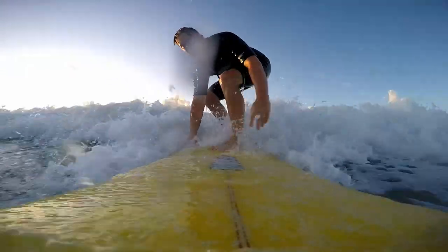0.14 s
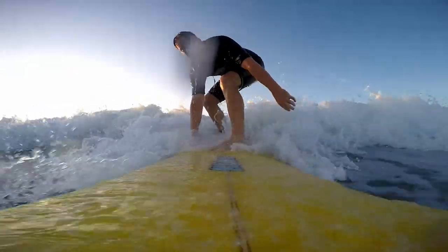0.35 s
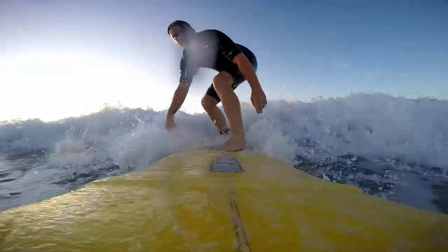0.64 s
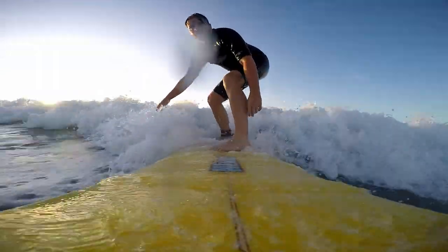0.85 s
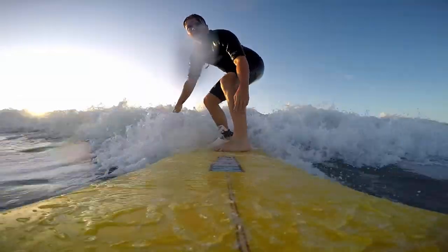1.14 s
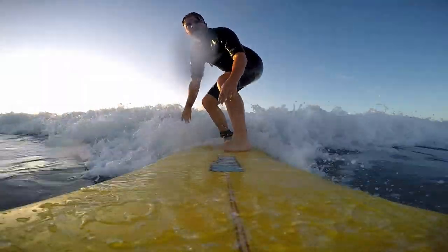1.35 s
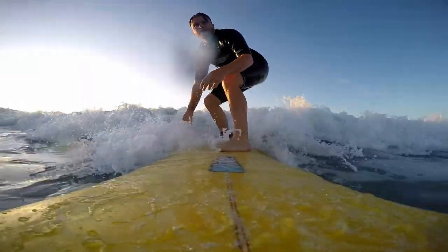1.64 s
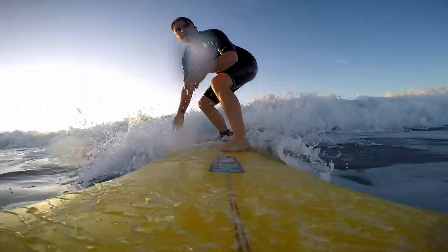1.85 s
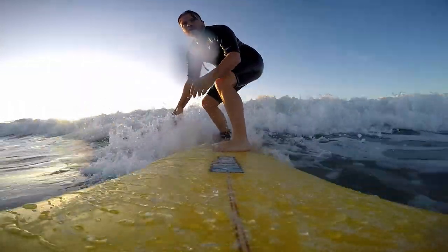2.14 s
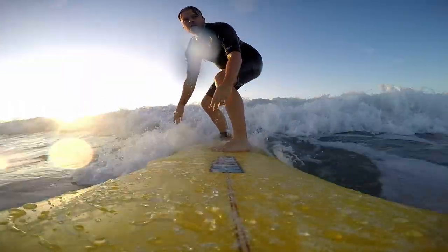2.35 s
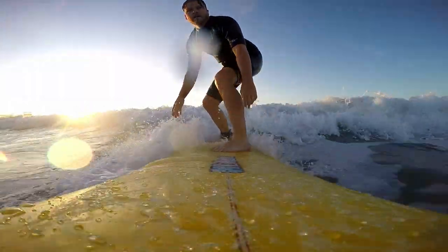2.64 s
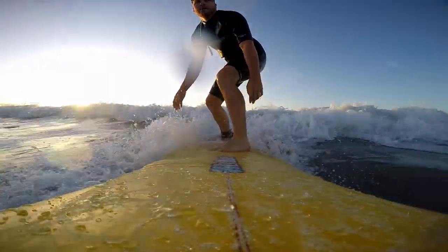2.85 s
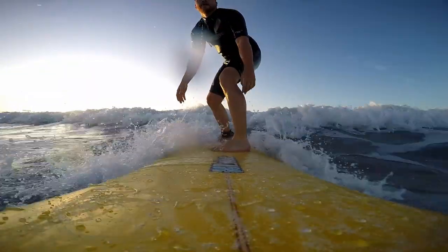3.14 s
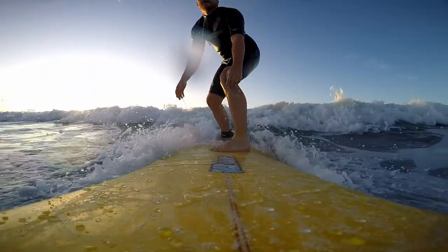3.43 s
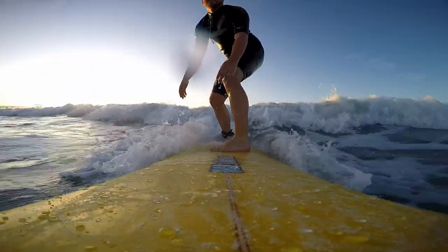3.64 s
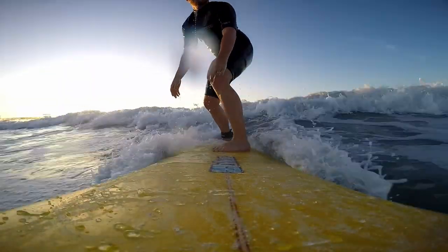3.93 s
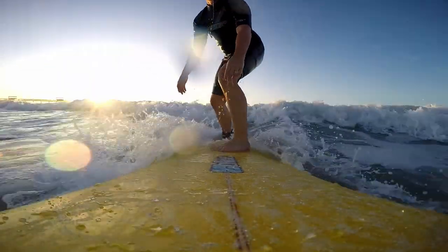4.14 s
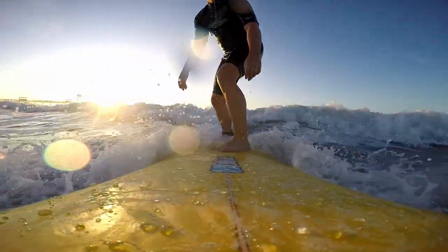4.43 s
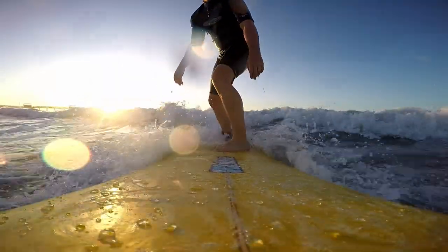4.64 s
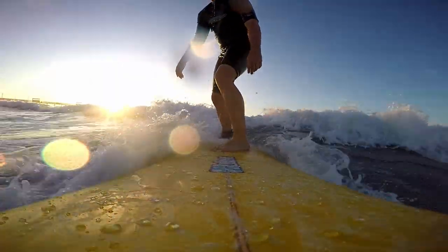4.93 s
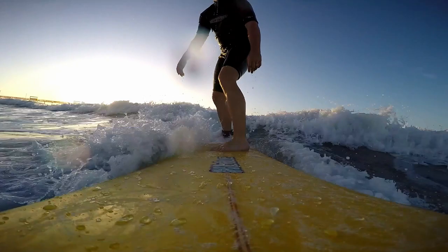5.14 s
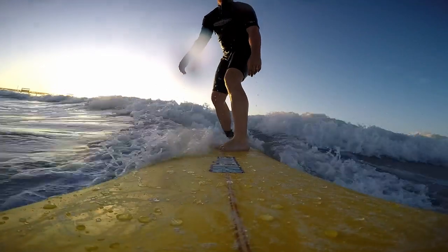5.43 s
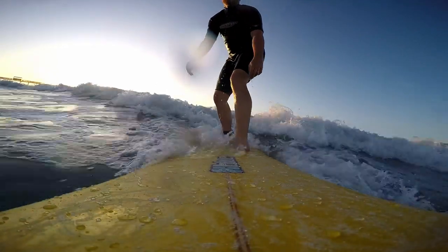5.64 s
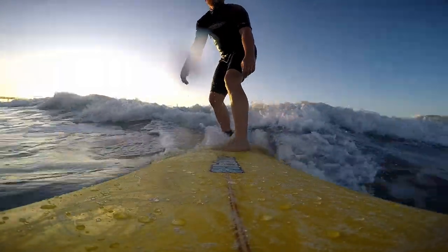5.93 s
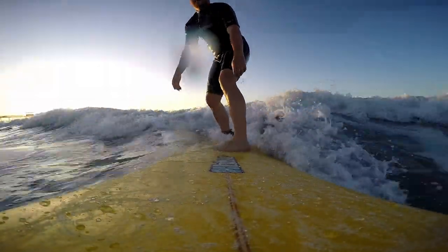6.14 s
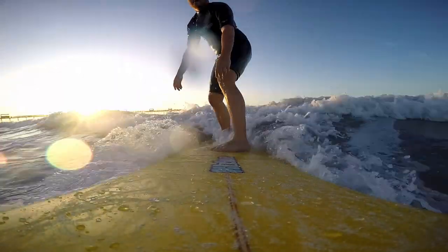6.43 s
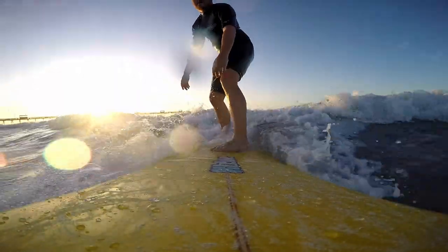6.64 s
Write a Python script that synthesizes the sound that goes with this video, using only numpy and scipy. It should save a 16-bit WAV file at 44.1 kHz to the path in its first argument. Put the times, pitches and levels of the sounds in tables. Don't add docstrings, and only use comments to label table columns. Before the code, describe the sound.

A continuous ride on whitewater, heard through the sealed shell of a camera on a surfboard's nose, so the water is dull and close with little treble. From 0 to 0.5 seconds, strong slaps, drops striking the housing and hollow air bursts crowd together over a deep, shuddering rumble. From 0.6 to 1.4 the foam thins, with a bump and small drops near 1.0 and weak plastic ticks. Thuds resume around 1.45, and fuller gurgling swells at 2.3 to 3.2 with irregular low bumps. Slaps and rattling clusters continue, busier from 4.1 to 4.8, with a strong splash near 4.4. The steady wash dips around 5 to 5.6 while bubbly surges and knocks persist. From 6.0 to 6.4 loud rising bloops and thick gurgling dominate; froth brightens briefly at 6.5. At 6.78 a sharp splash, bubble burst and heavy bump end it abruptly.

```python
import sys
import numpy as np
from scipy import signal
from scipy.fft import rfft, irfft, next_fast_len
from scipy.io import wavfile
from scipy.ndimage import map_coordinates

SR = 44100
rng = np.random.default_rng(int(sys.argv[2]) if len(sys.argv) > 2 else 0)


def linear_from_db(decibels):
    return 10 ** (np.asarray(decibels, float) / 20)


def to_wav(sig):
    pcm = np.clip(np.atleast_2d(sig), -1, 1) * 32767
    pcm = np.round(pcm).astype(np.int16)
    wavfile.write(sys.argv[1], SR, pcm.T)


N = 299770

# time in seconds, level in dB.
SPRAY_LEVEL = [(0.0, -60.5), (0.3, -61.5), (0.53, -68.5), (0.89, -73), (1.53, -68.5), (2.61, -66.5),
               (3.22, -61), (3.69, -67.5), (4.37, -63.5), (5.24, -64), (5.41, -65), (6.0, -64.5),
               (6.19, -61), (6.8, -62)]
# time in seconds, flow in dB, froth relative to gurgle in dB.
FOAM_FLOW = [(0, -41, -5), (.4, -46.5, -6), (.8, -49, -7.5), (1.3, -53.5, -8), (1.9, -46, -7),
             (2.4, -43, -7), (2.7, -38.5, -5.5), (3.0, -40, -4.5), (3.6, -46, -5.5), (4.1, -37, -4.5),
             (4.6, -40.5, -5), (5.0, -53, -4.5), (5.5, -59, -4.5), (5.9, -46, -6), (6.3, -40.5, -9.5),
             (6.5, -38, -0.5), (6.72, -38, -8.5), (6.8, -55, 5)]
# peak time in seconds, slap level in dB,
# gurgle level in dB, rise in seconds, fall in seconds.
SURGES = [(.01, -26, -36, 0.014, 0.0069), (.14, -36, -41.5, 0.041, 0.29), (.35, -31.5, -38.5, 0.022, 0.019),
          (0.408, -32.5, -33, 0.01, 0.036), (.61, -45.5, -53, 0.099, 0.13), (.84, -47, -63, 0.068, 0.045),
          (1.0, -45.5, -45.5, 0.087, 0.36), (1.48, -34.5, -37, 0.084, 0.02),
          (1.86, -37, -37.5, 0.38, 0.043), (2.29, -39, -37.5, 0.23, 0.18), (2.38, -37, -42.5, 0.14, 0.087),
          (2.8, -35.5, -39.5, 0.084, 0.059), (3.14, -35.5, -35.5, 0.12, 0.52),
          (3.76, -35, -39.5, 0.11, 0.05), (4.122, -34, -47, 0.062, 0.08), (4.4, -31, -31.5, 0.048, 0.11),
          (4.67, -40, -36.5, 0.025, 1), (5.03, -38.5, -34.5, 0.11, 0.29), (5.401, -36.5, -36.5, 0.22, 0.07),
          (5.63, -38.5, -32.5, 0.056, 0.1), (5.8, -39, -34.5, 0.053, 0.021), (6.16, -37, -33, 0.27, 0.07),
          (6.36, -36.5, -28.5, 0.12, 0.047), (6.785, -30, -31, 0.026, 0.14)]
# frequency in Hz, level in dB.
HEAVE_SPECTRUM = [(8, -20.5), (18, -3), (28, -6.5), (45, -1.5), (65, -14.5), (90, -43), (130, -120)]
SLAP_SPECTRUM = [(45, -120), (70, -8.5), (110, -7.5), (180, -3), (260, 1), (310, -2), (390, -7.5),
                 (520, -120)]
GURGLE_SPECTRUM = [(300, -120), (400, -8.5), (490, -3.5), (650, -1), (850, -3), (1000, -7.5), (1080, -16),
                   (1300, -120)]
FROTH_SPECTRUM = [(850, -120), (1080, -7), (1350, -4), (1600, -3), (1800, -6.5), (2000, -17.5),
                  (2500, -120)]
SPRAY_SPECTRUM = [(1400, -120), (1900, -1), (2500, -6.5), (3200, -9), (4000, -12), (5000, -19.5),
                  (6000, -21.5), (7500, -25), (9500, -28.5), (11000, -120)]
# start in seconds, peak level in dB, pitch in Hz.
AIR_POCKETS = [(.206, -20.5, 547), (.331, -18, 670), (.341, -26, 1010), (.072, -33, 640), (.173, -29, 536),
               (.859, -31, 610), (.887, -34, 630), (.919, -28, 595), (.964, -37, 700), (1.303, -33, 514),
               (1.347, -28, 585), (1.397, -28, 680), (2.663, -30, 510), (0.417, -22, 448),
               (2.292, -23.5, 650), (2.421, -22.5, 734), (2.582, -28, 790), (5.0, -22, 1030),
               (3.402, -25, 704), (4.143, -34, 640), (4.197, -28, 710), (4.384, -24, 564), (4.54, -25, 640),
               (4.785, -21.5, 710), (5.321, -19.5, 772), (5.6, -19, 760), (5.794, -30, 594),
               (6.019, -17, 675), (6.098, -23, 673), (6.234, -19, 637), (6.257, -32, 640),
               (6.3, -14.5, 726), (6.651, -19.5, 633), (6.776, -14.5, 790)]
# start in seconds, peak level in dB, pitch in Hz.
THUDS = [(0.128, -26, 332), (0.583, -37, 236), (0.827, -31, 215), (0.947, -39, 208), (1.098, -37, 190),
         (1.426, -25, 246), (1.456, -27.5, 157), (1.589, -42, 145), (1.673, -25.5, 255), (1.767, -33, 218),
         (1.838, -33, 196), (2.281, -21.5, 207), (2.329, -31, 186), (2.379, -24, 268), (2.767, -22.5, 290),
         (3.119, -27.5, 257), (3.169, -24, 277), (3.74, -26, 275.5), (3.966, -30.5, 232),
         (4.105, -21.5, 272.3), (4.198, -25.5, 250), (4.378, -24, 238), (4.658, -24, 250), (4.71, -24, 229),
         (4.959, -28, 274), (5.309, -24, 143), (5.392, -31, 308), (5.791, -31, 155), (6.023, -24.5, 286),
         (6.1, -24, 260), (6.154, -27, 254), (6.308, -26, 237), (6.369, -30, 284), (6.487, -32, 240)]
# start in seconds, peak level
# in dB, pitch in Hz, crack level in dB.
DROPS = [(.032, -47, 3600, -5.5), (.066, -56, 7860, -7), (.074, -54, 5400, -16), (0.092, -29.5, 1530, -41),
         (.108, -54, 5800, -26), (0.1467, -37, 3130, -24), (0.153, -34.5, 1500, -15),
         (.173, -26.5, 1460, -33), (0.369, -30.5, 65.6, -58), (0.3996, -26.5, 2450, -20),
         (0.401, -38, 3870, -29), (.401, -23, 1180, -40), (.4016, -24.5, 386, -25),
         (0.4087, -35.5, 2620, -14.5), (0.418, -25.5, 960, -12), (0.4433, -40.5, 3050, -23),
         (0.984, -30.5, 70.4, -60), (0.992, -37, 1040, -25), (.998, -46, 2100, -21),
         (1.0047, -31, 1110, -19), (1.0062, -30, 400, -18), (1.0245, -49.5, 4000, -2.5),
         (1.045, -38, 2180, -18), (1.062, -46.5, 2660, -16), (4.947, -45, 3040, -22),
         (5.63, -46, 2760, -31), (6.403, -28, 1500, -24), (6.7729, -23, 1400, -46),
         (6.7766, -18, 1440, -46), (6.782, -16.5, 790, -40), (6.7849, -27.5, 90.4, -43)]
# time in seconds, level in dB.
BREAK_TICKS = [(0.0032, -47.5), (0.2123, -49), (0.2203, -55), (0.2312, -52), (0.2432, -54), (0.3115, -62),
               (0.315, -51), (0.3186, -61), (0.3231, -53), (0.3354, -47), (0.3425, -48), (0.3575, -50),
               (0.3627, -55), (0.4112, -53), (0.4765, -57), (0.5397, -57.5), (0.5901, -51.5), (0.5986, -61),
               (0.6058, -62), (0.6112, -59), (0.7253, -65), (0.7332, -64), (0.7399, -64), (0.7433, -57.5),
               (0.7865, -61), (0.8246, -57), (0.8316, -56), (0.8381, -54), (0.8547, -63), (0.8582, -62),
               (0.918, -64), (0.9217, -67), (0.9631, -58), (0.9669, -56), (1.0513, -60), (1.0652, -54),
               (1.1307, -66), (1.1784, -61), (1.1887, -64), (1.1926, -60), (1.2076, -61), (1.2233, -60),
               (1.2377, -64), (1.2441, -62), (1.266, -61), (1.2696, -58), (1.2851, -59), (1.2987, -62),
               (1.3202, -60), (1.3255, -62), (1.3334, -64.5), (1.3424, -61), (1.4604, -50), (1.469, -53),
               (1.4754, -57), (1.4814, -50.5), (1.4856, -61), (1.5685, -61), (1.5885, -54), (1.5926, -56)]
CHOP_TICKS = [(1.6038, -54), (1.6093, -57), (1.615, -59), (1.6297, -56), (1.634, -63), (1.642, -62),
              (1.6809, -53.5), (1.6882, -61), (1.6929, -56), (1.7026, -59), (1.7071, -57), (1.7129, -56),
              (1.7204, -53), (1.7251, -58), (1.7336, -52), (1.7402, -54), (1.7516, -55), (1.7766, -58),
              (1.7893, -54), (1.842, -52), (1.8458, -46.5), (1.8495, -53), (1.8546, -52.5), (1.8645, -57),
              (1.8779, -56), (1.8892, -51), (1.9823, -53), (1.9867, -66), (1.9936, -64), (2.0511, -62),
              (2.1901, -61), (2.2594, -58.5), (2.2874, -50), (2.2918, -47.5), (2.2961, -51), (2.3239, -61),
              (2.3295, -51), (2.34, -53.5), (2.3548, -53), (2.3585, -60), (2.3711, -58), (2.3747, -50),
              (2.4686, -57), (2.4823, -52), (2.4861, -55.5), (2.4979, -56), (2.5688, -56), (2.5728, -59),
              (2.5775, -65), (2.5996, -63), (2.6086, -62), (2.6245, -56), (2.6378, -65), (2.6613, -56),
              (2.6773, -57), (2.6891, -61), (2.6926, -59), (2.6966, -62), (2.7023, -54), (2.7192, -60.5)]
FACE_TICKS = [(2.8015, -57), (2.8111, -54), (2.8738, -51), (2.8854, -59), (2.8904, -59), (2.894, -53),
              (2.9005, -65), (2.914, -53), (2.918, -49.5), (2.9216, -57), (2.9288, -58), (2.94, -59),
              (2.951, -61), (2.9517, -53), (2.9685, -57), (2.9994, -61), (3.0158, -60.5), (3.0366, -57),
              (3.1665, -48), (3.1723, -58), (3.1841, -51), (3.2655, -61), (3.289, -55), (3.298, -50),
              (3.3126, -57), (3.4042, -50), (3.4326, -58), (3.4404, -49.5), (3.4728, -54), (3.5505, -62),
              (3.5557, -67), (3.5607, -58), (3.579, -66), (3.5853, -55), (3.7114, -65), (3.7318, -52),
              (3.746, -48.5), (3.7567, -52), (3.7622, -56), (3.7658, -55), (3.77, -54.5), (3.8675, -58),
              (3.8732, -55), (3.879, -56), (3.992, -58.5), (4.0966, -56), (4.1079, -51), (4.1404, -54),
              (4.144, -59), (4.15, -48), (4.158, -57), (4.1633, -55), (4.1808, -53), (4.2042, -53),
              (4.2063, -55), (4.2172, -50), (4.2437, -60), (4.25, -62), (4.253, -56), (4.2943, -59)]
TROUGH_TICKS = [(4.326, -59), (4.37, -51), (4.4014, -45.5), (4.406, -56), (4.412, -50), (4.4324, -41),
                (4.4464, -43), (4.455, -52), (4.496, -59), (4.5014, -58), (4.5254, -61), (4.557, -57),
                (4.5614, -58), (4.6103, -60), (4.611, -59), (4.6222, -54), (4.6613, -52), (4.666, -49),
                (4.676, -50), (4.6812, -47.5), (4.687, -52), (4.7054, -54), (4.733, -46), (4.7376, -49),
                (4.7448, -50), (4.748, -58), (4.7958, -48), (4.8004, -56), (4.8076, -51.5), (4.8158, -61),
                (4.8186, -54), (4.8271, -57), (4.853, -55), (4.8589, -60), (4.8623, -54), (4.8696, -59.5),
                (4.8763, -59.5), (4.9344, -57), (4.9409, -53), (4.9933, -54), (5.0376, -49), (5.0452, -52),
                (5.0514, -55), (5.0828, -52), (5.0986, -60), (5.179, -60), (5.2838, -56.5), (5.3208, -52.5),
                (5.3347, -56), (5.3446, -57), (5.3962, -52), (5.4072, -46), (5.414, -54), (6.033, -55),
                (6.0402, -53), (6.0455, -58), (6.113, -52.5), (6.1547, -50), (6.1622, -42.5), (6.1677, -50)]
FOAM_TICKS = [(0.0084, -52), (0.0131, -49), (4.2364, -59), (4.274, -57), (6.2033, -54), (6.2916, -51.5),
              (6.327, -52.5), (6.3666, -55), (6.4934, -57), (6.5014, -48.5), (6.5068, -59), (6.561, -55),
              (6.57, -54.5), (6.6373, -54)]
# frequency in Hz, width in Hz, level in dB.
MOUNT_MODES = [(263, 170, 15.5), (760, 746, 16), (3600, 400, -0.5), (3950, 450, 0.5), (4710, 500, 1),
               (5080, 540, -7), (7030, 950, -9.5), (8000, 990, -12), (8940, 3500, -27.5)]
# peak time in seconds, peak level in dB, half length in seconds, pitch in Hz.
EARLY_BUMPS = [(0.0, -24.5, 0.227, 40.3), (0.165, -20.5, 0.098, 36.9), (0.271, -25, 0.041, 36.75),
               (0.395, -24, 0.092, 29.82), (0.412, -16.5, 0.016, 30.2), (0.474, -19.5, 0.034, 32.5),
               (0.514, -28.5, 0.084, 38.4), (0.646, -32.5, 0.019, 31.2), (0.704, -35.5, 0.048, 36.27),
               (0.81, -30, 0.041, 34.86), (0.88, -28.5, 0.023, 35.5), (0.949, -39, 0.012, 34.4),
               (1.019, -19, 0.029, 35.3), (1.073, -23.5, 0.075, 35.33), (1.291, -32, 0.023, 37.4),
               (1.486, -22, 0.1163, 36.27), (1.856, -24.5, 0.018, 30.1), (1.856, -31.5, 0.674, 30.65),
               (1.935, -26, 0.025, 30.04), (2.005, -25, 0.049, 35.9), (2.115, -25, 0.015, 32.9),
               (2.222, -22, 0.068, 31.04), (2.313, -19.1, 0.024, 34.67), (2.382, -22.5, 0.032, 33.14),
               (2.454, -31, 0.021, 34.4), (2.607, -27, 0.0628, 39.6), (2.785, -21.5, 0.037, 33.64),
               (2.892, -23, 0.029, 39.4), (2.961, -24.5, 0.048, 35.74), (3.037, -26.5, 0.031, 32.84),
               (3.178, -21.5, 0.1, 35.63), (3.296, -22.5, 0.133, 40.03)]
LATER_BUMPS = [(3.468, -21.5, 0.036, 37.22), (3.506, -31.5, 0.11, 37.86), (3.701, -27, 0.036, 29.45),
               (3.81, -23.3, 0.05, 36.12), (3.886, -24, 0.034, 35.43), (3.969, -22.5, 0.029, 38.6),
               (4.057, -26, 0.05, 33.43), (4.182, -21, 0.087, 37.5), (4.313, -27.5, 0.034, 39.3),
               (4.435, -20.5, 0.053, 35.17), (4.546, -29, 0.02, 37.9), (4.715, -31.5, 0.338, 29.51),
               (4.746, -25.5, 0.028, 32.04), (4.84, -25.5, 0.027, 41.3), (4.894, -26.0, 0.029, 38.66),
               (5.091, -21, 0.117, 40.02), (5.333, -27.0, 0.066, 37.34), (5.426, -28, 0.037, 34.2),
               (5.542, -26, 0.064, 37.55), (5.666, -26.5, 0.028, 36.17), (5.777, -24.5, 0.066, 38.86),
               (5.897, -24, 0.032, 38.78), (5.974, -22, 0.026, 33.22), (6.025, -25.5, 0.037, 31.14),
               (6.085, -23.5, 0.038, 36.57), (6.14, -20.5, 0.023, 35.63), (6.2, -19.5, 0.044, 36.02),
               (6.283, -26.5, 0.054, 29.95), (6.372, -21.5, 0.05, 35.96), (6.476, -28, 0.065, 27.73),
               (6.567, -23.5, 0.05, 40.18), (6.672, -25.5, 0.091, 38.54), (6.79, -17.5, 0.031, 36)]


def unit(x):
    return x / np.sqrt(np.mean(x ** 2) + 1e-20)


def curves(rows):
    times, *columns = np.transpose(rows)
    return [np.interp(np.arange(N) / SR, times, column) for column in columns]


def wobble(rate):
    knots = rng.standard_normal(N // 200)
    return map_coordinates(knots, [np.arange(N) * rate / SR])


def filtered(x, response):
    size = next_fast_len(N + SR // 2)
    hz = np.fft.rfftfreq(size, 1 / SR)
    return irfft(rfft(x, size) * response(hz), size)[..., :N]


def coloured(x, points):
    f, db = np.transpose(points)
    return unit(filtered(x, lambda hz: linear_from_db(np.interp(np.log(hz + 1), np.log(f), db))))


def add(track, start, sound):
    part = track[round(start * SR):][:len(sound)]
    part += sound[:len(part)]


def swells(s, db, rise, fall):
    coarse = np.arange(0, N, 32)
    late = coarse / SR - s[:, None]
    before = -late / np.abs(rise)[:, None]
    after = late / np.abs(fall)[:, None]
    away = np.where(late < 0, before, after)
    power = linear_from_db(2 * (db[:, None] - 10 * away)).sum(0)
    return np.interp(np.arange(N), coarse, power)


def bubbles(count, hz, spread, cycles, size_db):
    when, pitch, size = rng.random((count, 3)).T[:, :, None]
    sample = np.arange(640)
    turns = hz * np.exp(spread * (2 * pitch - 1)) * sample / SR
    level = linear_from_db(-size_db * np.log(1.02 - size))
    grain = level * np.exp(-turns / cycles) * np.sin(2 * np.pi * turns * (1 + 0.017 * turns))
    grain *= np.hanning(1280)[640:]
    at = (when * N).astype(int) + sample
    return unit(np.bincount(at.ravel(), grain.ravel())[:N])


def churn(colour, grains, share, lumpy_db, surge):
    noise = coloured(rng.standard_normal(N), colour)
    mix = np.sqrt(1 - share) * noise + np.sqrt(share) * coloured(grains, colour)
    return unit(mix * linear_from_db(lumpy_db * wobble(22) + surge))


def spray(surge):
    level_db, = curves(SPRAY_LEVEL)
    grains = bubbles(count=5000, hz=3200, spread=0.6, cycles=3, size_db=4)
    mist = churn(SPRAY_SPECTRUM, grains, share=0.2, lumpy_db=0.8, surge=0.7 * surge)
    return linear_from_db(level_db + 2.0) * mist


def foam(surge):
    flow_db, fine_db = curves(FOAM_FLOW)
    s, slap_peak_db, gurgle_peak_db, rise, fall = np.transpose(SURGES)
    slap_flow_db = flow_db - 5.5
    slap_db = 10 * np.log10(swells(s, slap_peak_db, rise, fall) + linear_from_db(2 * slap_flow_db))
    gurgle_db = 10 * np.log10(swells(s, gurgle_peak_db, rise, fall) + linear_from_db(2 * flow_db))
    froth_db = gurgle_db + fine_db

    large = bubbles(count=900, hz=230, spread=0.65, cycles=1.9, size_db=4)
    slap = churn(SLAP_SPECTRUM, large, share=0.2, lumpy_db=0.5, surge=surge)
    medium = bubbles(count=2500, hz=653.0, spread=0.54, cycles=3, size_db=2.0)
    gurgle = churn(GURGLE_SPECTRUM, medium, share=0.32, lumpy_db=-0.82, surge=surge)
    small = bubbles(count=4000, hz=1406, spread=0.28, cycles=4.5, size_db=4.0)
    froth = churn(FROTH_SPECTRUM, small, share=0.51, lumpy_db=-0.2, surge=surge)
    return linear_from_db(slap_db - 1.5) * slap + linear_from_db(gurgle_db - 0.9) * gurgle + linear_from_db(froth_db - 1.87) * froth


def drops():
    out, t = np.zeros(N), np.arange(SR // 10) / SR
    for s, db, hz, crack_db in DROPS:
        t60 = 0.015 * (hz / 1000) ** -0.65
        onset = 1 - np.exp(-(t * hz * 2.53) ** 2)
        tock = np.sin(2 * np.pi * hz * t) * linear_from_db(-60 * t / t60) * onset
        splash = np.convolve(rng.standard_normal(len(t)), np.hanning(8) / 2.5, 'same')
        crack = splash * linear_from_db(crack_db - 60 * t / 0.0082)
        add(out, s, linear_from_db(db + 4.5) * (tock + crack))
    return out


def pockets():
    out, t = np.zeros(N), np.arange(SR // 10) / SR
    for s, db, hz in AIR_POCKETS:
        shape = (1 - np.exp(-t / 0.0012)) * linear_from_db(-60 * t / 0.044)
        phase = 2 * np.pi * hz * t * (1 + 3 * t) + 5.8 * rng.random()
        add(out, s, linear_from_db(db - 3.0) * shape * np.sin(phase))
    return out


def thuds():
    out, t = np.zeros(N), np.arange(SR // 10) / SR
    for s, db, hz in THUDS:
        shape = (1 - np.exp(-(t / 0.011) ** 2)) * linear_from_db(-60 * t / 0.08)
        phase = 2 * np.pi * hz * t * (1 - 1.5 * t) + 6 * rng.random()
        add(out, s, linear_from_db(db + 3.5) * shape * np.sin(phase))
    return out


def mount_response(hz):
    total = 0
    for k, (centre, width, db) in enumerate(MOUNT_MODES):
        damping = 1j * hz * width
        mode = damping / (centre * centre - hz * hz + damping)
        total = total + (-1) ** k * linear_from_db(db) * mode ** 2
    return total


def mount():
    hits, t = np.zeros(N), np.arange(400) / SR
    for s, db in BREAK_TICKS + CHOP_TICKS + FACE_TICKS + TROUGH_TICKS + FOAM_TICKS:
        scuff = linear_from_db(-15.5 - 60 * t / 0.017) * rng.standard_normal(400)
        click = t == 0
        soon, late, weak = rng.random(3)
        add(hits, s - 0.0004, linear_from_db(db + 23.5) * (scuff + click))
        add(hits, s + 0.002 + 0.0016 * soon, linear_from_db([db + 18 - 5 * weak]))
        add(hits, s - 0.001 - 0.0031 * weak, linear_from_db([db - 8 * late]))
        add(hits, s + 0.0025 + 0.028 * late, linear_from_db([db + 16 - 6 * soon]))
    return filtered(hits, mount_response)


def board():
    s, db, half, hz = np.transpose(EARLY_BUMPS + LATER_BUMPS)[:, :, None]
    idle_power = linear_from_db(2 * -42.5)
    coarse = np.arange(0, N, 64)
    each = linear_from_db(2 * (db - 10 * ((coarse / SR - s) / half) ** 2))
    power = each.sum(0) + idle_power
    pitch = ((each * hz).sum(0) + 38 * idle_power) / power
    clear = np.diff(s, axis=0, prepend=0) > 0.95 * (half + np.roll(half, 1))
    direction = (-1.) ** np.cumsum(clear, 0)
    side = np.tanh(3 * (each * direction).sum(0) / power)
    level_db = np.interp(np.arange(N), coarse, 10 * np.log10(power))
    pitch = np.interp(np.arange(N), coarse, pitch)
    side = np.interp(np.arange(N), coarse, side)

    turns = np.cumsum(1.03 * pitch * np.exp(0.03 * wobble(30))) / SR
    swing = np.cos(2 * np.pi * (turns - turns[-1]))
    bend = unit(linear_from_db(0.85 * wobble(34)) * swing) * side * np.sign(side[-1])
    heave = coloured(rng.standard_normal(N), HEAVE_SPECTRUM)
    return linear_from_db(level_db - 0.6) * bend + linear_from_db(0.9 * level_db - 15) * heave


def scene():
    surge = 1.34 * wobble(30)
    water = spray(surge) + foam(surge) + drops() + pockets() + thuds()
    return (water + mount() + board())[None]


def top_cut(x):
    return signal.sosfilt(signal.butter(12, 10200, fs=SR, output="sos"), x)


def record(dry):
    squeezed = dry / (1 + np.abs(dry / 0.26) ** 4) ** (1 / 4)
    lowpass = signal.butter(15, 10100, fs=SR, output='sos')
    mix = signal.sosfiltfilt(lowpass, squeezed)
    return top_cut(mix)


dry = scene()
out = record(dry)
to_wav(out)
```